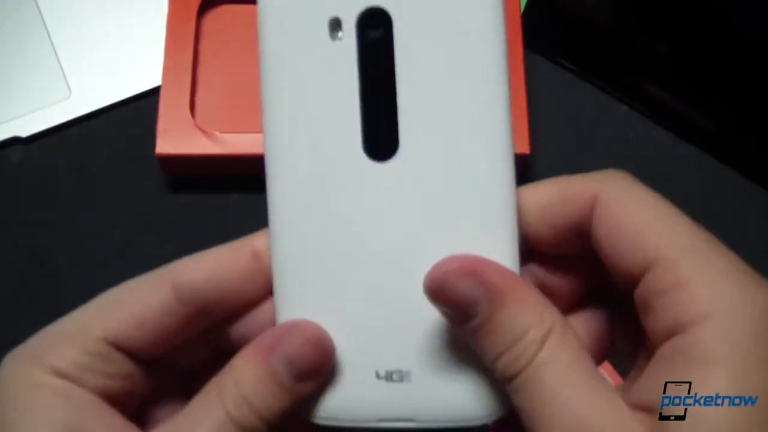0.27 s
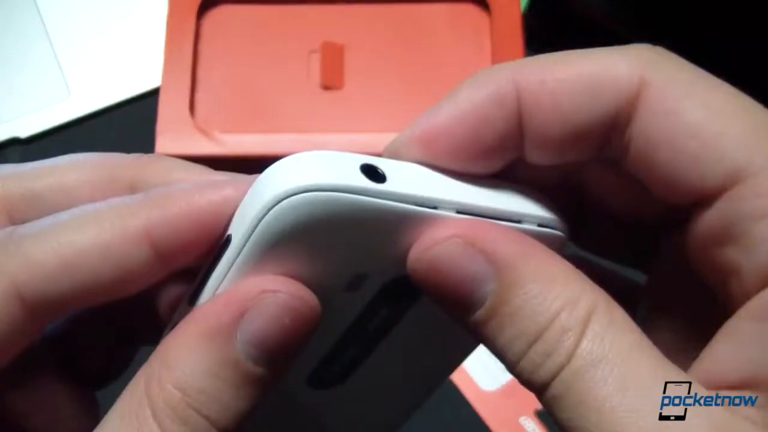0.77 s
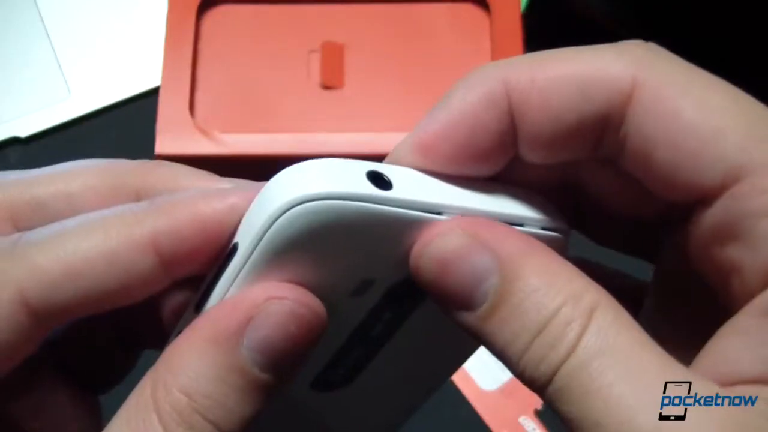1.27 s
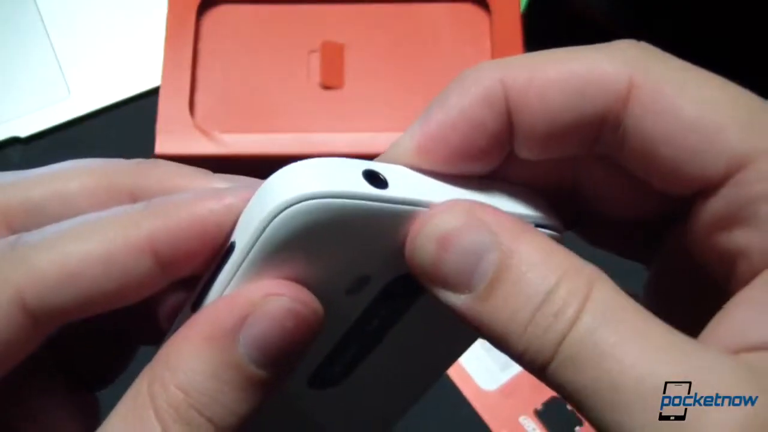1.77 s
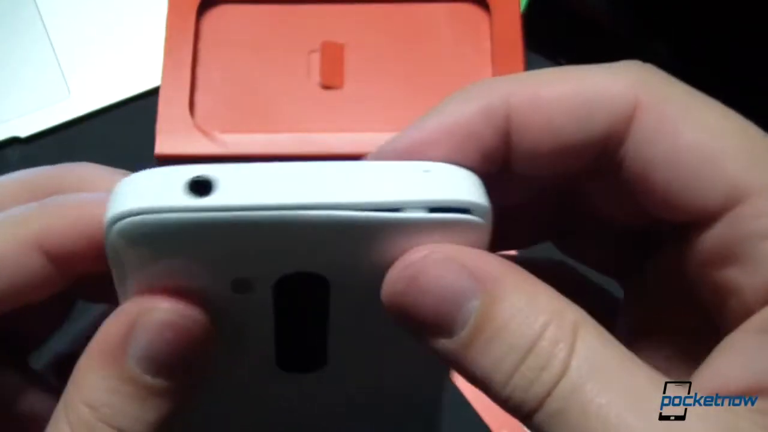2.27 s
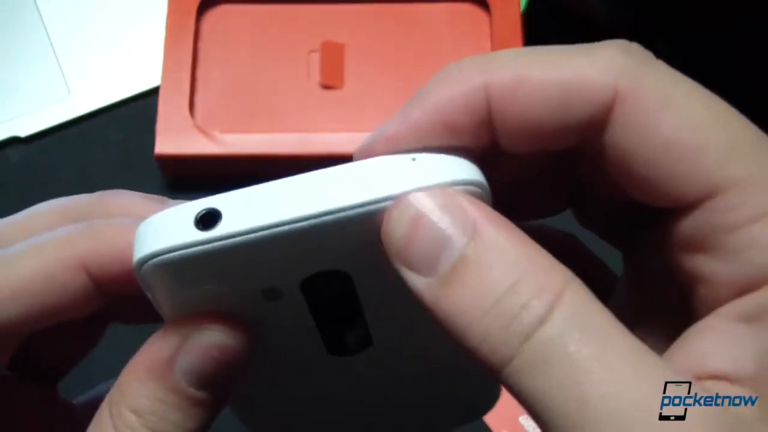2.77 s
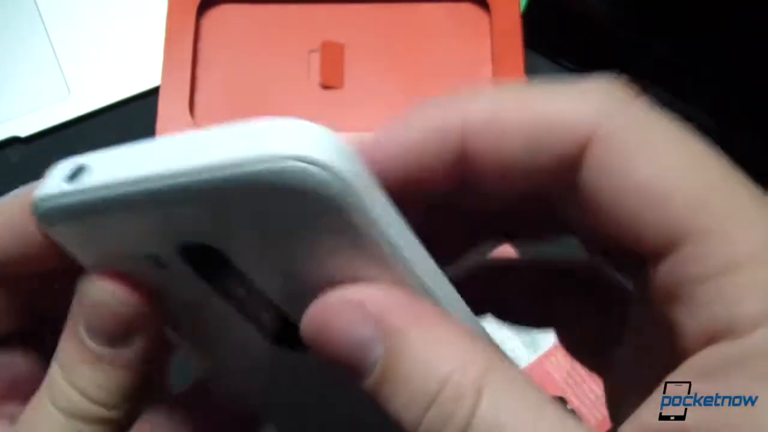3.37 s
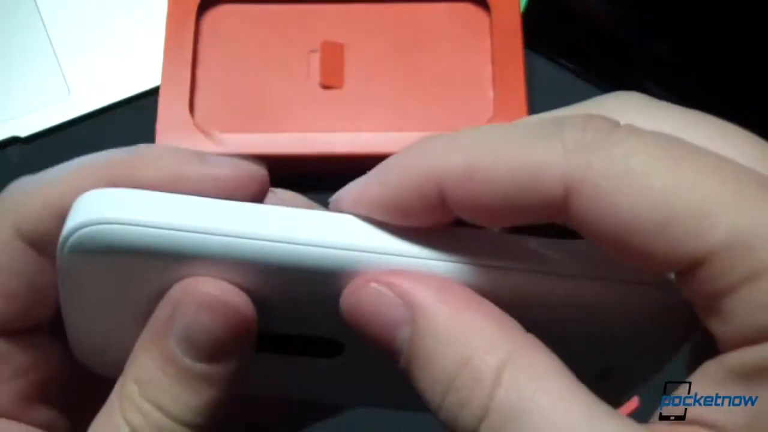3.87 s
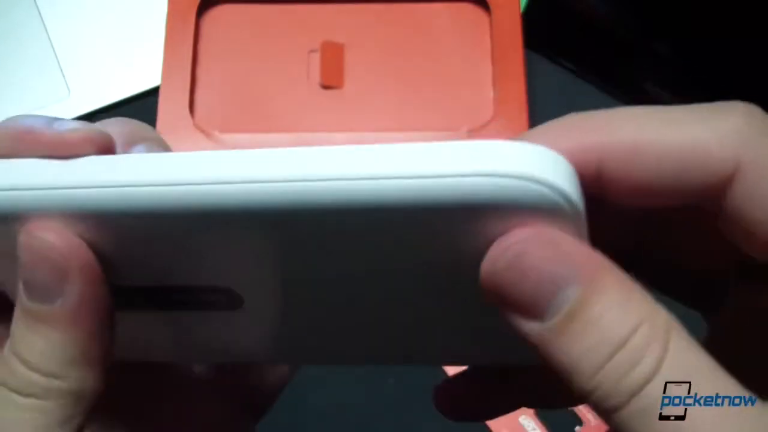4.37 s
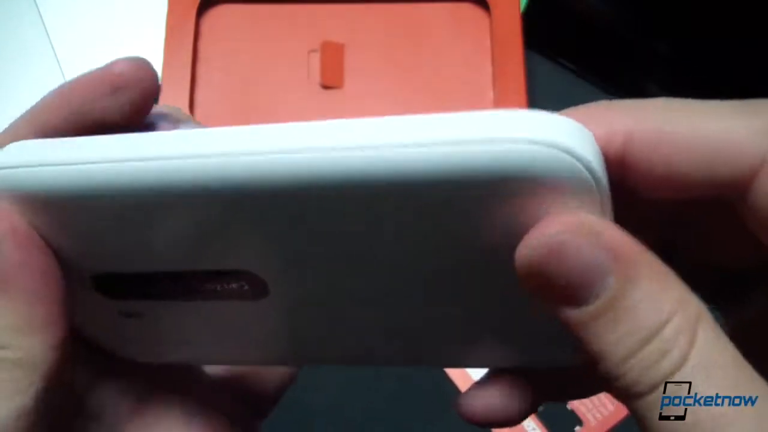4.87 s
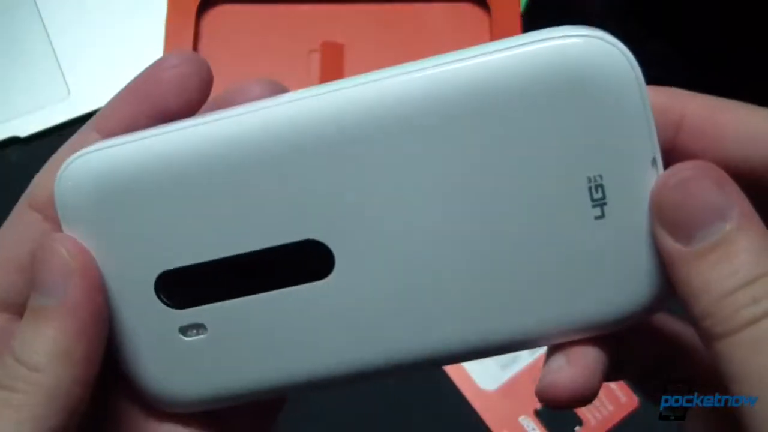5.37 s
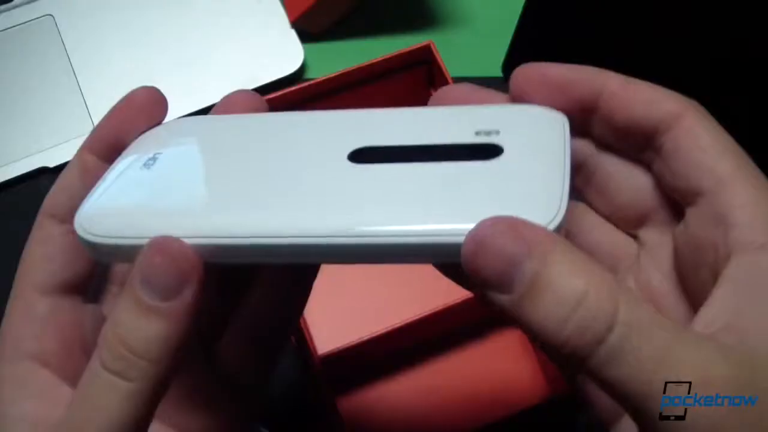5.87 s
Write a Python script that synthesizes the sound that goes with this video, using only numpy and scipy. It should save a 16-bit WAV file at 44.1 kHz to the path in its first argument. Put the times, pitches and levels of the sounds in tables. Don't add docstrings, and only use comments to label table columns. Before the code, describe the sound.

Three loud, short plastic clicks, the first immediate, the others near the middle, each a hard crack with a hollow shell ring dying in a few hundredths of a second. Around the later two come tiny nail ticks, soft knocks, creaks and skin rubs, which thin out afterwards. Close, dry indoor sound at a desk, with a dull surface answer, faint deep rumble and steady microphone hiss.

```python
import sys
import numpy as np
from scipy import signal
from scipy.fft import rfft, irfft, next_fast_len
from scipy.io import wavfile
from scipy.ndimage import map_coordinates

SR = 44100
rng = np.random.default_rng(int(sys.argv[2]) if len(sys.argv) > 2 else 0)


def materialize(psi):
    bounded = np.clip(np.atleast_2d(psi).T, -1, 1)
    quanta = np.round(bounded * 32767).astype(np.int16)
    wavfile.write(sys.argv[1], SR, quanta)


def gain_from_decibels(decibels):
    exponent = np.asarray(decibels, float) / 20
    return 10 ** exponent


N = 269671


def unit(x):
    return x / np.sqrt(np.mean(x ** 2) + 1e-20)


def along(points, hz):
    f, v = np.transpose(points)
    return np.interp(np.log(hz + 1), np.log(f + 1), v)


def filtered(x, response):
    m = next_fast_len(len(x) + 8192)
    return irfft(rfft(x, m) * response(np.fft.rfftfreq(m, 1 / SR)), m)[:len(x)]


def hump(centre_hz, octaves):
    return lambda hz: np.exp(-.5 * (np.log2((hz + 1) / centre_hz) / octaves) ** 2)


def wobble(rate):
    return map_coordinates(rng.standard_normal(128), [np.arange(N) * rate / SR])


def add(track, s, sound):
    part = track[round(s * SR):][:len(sound)]
    part += sound[:len(part)]


# frequency in Hz, density in dB per Hz.
HISS_SPECTRUM = [(88, -30), (150, -5), (236, -4.5), (356, -7), (409, -11), (594, -13.5), (1230, -16),
                 (1530, -20), (15000, -29), (16500, -31.5)]


def microphone_hiss():
    hiss = unit(filtered(rng.standard_normal(N), lambda hz: gain_from_decibels(along(HISS_SPECTRUM, hz))))
    air = unit(filtered(rng.standard_normal(N), hump(500, 1.0)))
    swell = map_coordinates(rng.standard_normal(60), [np.arange(N) / SR * 7])
    return gain_from_decibels(-70.5) * hiss + gain_from_decibels(-82.5 + 3 * np.tanh(swell)) * air


# frequency in Hz, density in dB per Hz.
RUMBLE_SPECTRUM = [(30, -21), (45, -1.5), (90, -2), (160, -11), (250, -34)]


def building_rumble():
    spectrum = [(15, -120)] + RUMBLE_SPECTRUM + [(600, -120)]
    rumble = unit(filtered(rng.standard_normal(N), lambda hz: gain_from_decibels(along(spectrum, hz))))
    return gain_from_decibels(-67 + 2.5 * wobble(11)) * rumble


# time in seconds, level in dB.
HUM_LEVEL = [(0.0, -52.5), (0.98, -54), (1.05, -61), (1.22, -52.5), (1.92, -54.5), (2.01, -63),
             (2.06, -53.5), (2.87, -56), (3.13, -64), (3.25, -50), (3.59, -46.5), (4.76, -57), (5.53, -53),
             (6.11, -55.5)]


def room_hum():
    t = np.arange(N) / SR
    scatter = unit(filtered(rng.standard_normal(N), hump(34, .3)))
    tone = np.sin(2 * np.pi * 23.7 * t + 0.73 * wobble(6))
    hum = unit(tone + 0.28 * scatter)
    return gain_from_decibels(np.interp(t, *np.transpose(HUM_LEVEL)) + 2.5 * wobble(6.3)) * hum


# middle in seconds, half length in seconds, frequency in Hz,
# level in dB, rise in Hz per second.
MACHINE_SWELLS = [
    (2.16, 0.082, 87.3, -59, 4),
    (5.825, 0.19, 92.6, -58, 18),
]


def distant_machine():
    t = np.arange(N) / SR
    drone = np.zeros(N)
    for mid, half, hz, db, rise in MACHINE_SWELLS:
        from_mid = t - mid
        envelope = gain_from_decibels(db) * np.exp(-(from_mid / half) ** 4)
        drone += envelope * np.sin(2 * np.pi * (hz + rise * from_mid / 2) * from_mid)
    return drone


# time in seconds, level in dB, frequency in Hz.
DESK_NUDGES = [(0.442, -58, 305.7), (0.711, -53.5, 172), (2.795, -45.5, 262), (3.062, -54.5, 77.4),
               (3.521, -48, 127), (3.565, -43, 80.6), (3.678, -55, 152), (4.872, -48, 70.3),
               (5.99, -54.5, 60)]


def desk_nudges():
    t = np.arange(N) / SR
    track = np.zeros(N)
    for s, db, hz in DESK_NUDGES:
        track += gain_from_decibels(db) * np.exp(-2 * ((t - s) * hz) ** 2) * np.sin(2 * np.pi * hz * (t - s))
    return track


def desk_top(x):
    t = np.arange(SR // 4) / SR
    tail = filtered(rng.standard_normal(len(t)), hump(360, .55))
    tail = tail * gain_from_decibels(-60 * t / .1) * (1 - np.exp(-t / .004))
    return gain_from_decibels(-31) * signal.fftconvolve(x, tail / np.linalg.norm(tail))[:N]


# time in seconds, level in dB, centre frequency in Hz.
NAIL_TICKS = [(.392, -55.5, 1500), (.533, -57, 1484), (.601, -61, 1800), (.715, -60, 1300),
              (2.049, -55, 5500), (2.2317, -56.5, 3350), (2.32, -62.5, 2500), (2.7950, -55, 4000),
              (2.8186, -53, 5500), (2.8252, -42, 2000), (3.2, -64, 2000), (3.462, -57, 5000),
              (3.548, -55, 2400), (3.881, -61, 1990), (3.947, -62, 6500), (4.064, -61.5, 2000),
              (4.326, -58, 2200), (4.338, -60, 2300), (4.399, -58.5, 2600), (4.862, -57.5, 5000),
              (5.895, -57, 2900)]
FLAT_TAPS = [(3.0572, -55.5, 5985), (3.069, -50, 3600), (3.5626, -53, 2300), (3.672, -61, 2200),
             (4.3582, -47, 5000), (4.80, -62, 3000)]
CREAKS = [(.0478, -37, 1700), (.494, -61.5, 5500), (1.7545, -50, 1993), (2.5117, -49.5, 2500),
          (3.0568, -55, 2500), (3.5826, -53.5, 3300), (4.1897, -55, 2500), (4.3818, -54.5, 3600)]
PAD_PATS = [(.4557, -53.5, 4500), (2.0067, -54.5, 2720), (2.0376, -56.5, 2500), (3.3751, -57, 1498)]
RATTLES = [(.0614, -19, 10000), (.0698, -31, 10000), (.392, -56, 6800)]


def small_contacts():
    track, t = np.zeros(N), np.arange(SR // 16) / SR
    # contacts, width in octaves, t60 in seconds
    kinds = [(NAIL_TICKS, .75, .013), (FLAT_TAPS, 1.65, .02), (CREAKS, .75, .03),
             (PAD_PATS, 1.4, .035), (RATTLES, .27, .0069)]
    for contacts, octaves, t60 in kinds:
        for s, db, centre_hz in contacts:
            burst = unit(filtered(rng.standard_normal(len(t)), hump(centre_hz, octaves)))
            add(track, s, gain_from_decibels(db - 60 * t / t60) * (1 - np.exp(-t / .0004)) * burst)
    return track


# time in seconds, level in dB, share of the deep mode in dB.
SOFT_KNOCKS = [(2.007, -54.5, -11), (2.04, -53, -10), (2.511, -57.5, 5), (2.7945, -47.5, -5),
               (2.818, -47, -7), (3.0568, -40, -30), (3.375, -50.5, -20), (3.5626, -55.5, -0.5),
               (4.19, -53, -20), (4.358, -58, -17)]


def soft_knocks():
    track, t = np.zeros(N), np.arange(SR // 16) / SR
    for s, db, deep_db in SOFT_KNOCKS:
        upper = gain_from_decibels(-60 * t / .022) * np.sin(2 * np.pi * 980 * t)
        deep = gain_from_decibels(deep_db - 60 * t / 0.06) * np.sin(2 * np.pi * 335 * t)
        add(track, s, gain_from_decibels(db) * (1 - np.exp(-t / 0.00074)) * (upper + deep))
    return track


# middle in seconds, half length in seconds, level in dB,
# centre frequency in Hz, width in octaves.
FINGER_SLIDES = [(0.322, .03, -69.5, 3040, 1.3), (0.462, 0.022, -64, 4000, 1.7),
                 (0.705, 0.019, -71.5, 4000, 1.9), (2.0, 0.013, -63, 5000, 3.5),
                 (2.045, 0.015, -78, 9000, 1.3), (3.026, 0.018, -64, 9150, 0.44),
                 (3.027, 0.03, -64.5, 2970, 2.7), (2.024, 0.018, -70, 6000, 1.7),
                 (3.357, 0.038, -67, 8000, 3.3), (3.375, 0.016, -66, 4000, 3.2),
                 (3.588, 0.011, -65.5, 1500, 2), (4.187, 0.029, -65.5, 3470, 1.54),
                 (4.99, .03, -71.5, 5980, 2.9), (6.05, 0.12, -74, 9000, 2)]


def finger_slides():
    track = np.zeros(N)
    from_mid = np.linspace(-1 / 8, 1 / 8, SR // 4)
    n = len(from_mid)
    for s, half, db, centre_hz, octaves in FINGER_SLIDES:
        noise = rng.standard_normal(n)
        grip = np.repeat(rng.standard_normal(n), 70)[:n]
        rub = unit(filtered(noise * gain_from_decibels(2.5 * grip), hump(centre_hz, octaves)))
        add(track, s - 1 / 8, gain_from_decibels(db) * np.exp(-2 * (from_mid / half) ** 2) * rub)
    return track


def fingers():
    touches = small_contacts() + soft_knocks() + finger_slides()
    return filtered(touches, lambda hz: 1 / np.sqrt(1 + (hz / 12500) ** 6))


# time in seconds, level in dB.
SETTLES = [
    (2.511, -46.5),
    (4.3572, -46),
]
# frequency in Hz, bandwidth in Hz, level in dB.
SETTLE_RINGS = [
    [(614, 270, -8.5), (1050, 240, -1.5), (1400, 410, -3.5), (1890, 133, 4), (2670, 560, -21),
     (4000, 340, -10), (5500, 1020, -17.5)],
    [(1580, 320, -4.5), (1940, 360, -5.5), (2500, 210, -1.5), (3200, 1100, -13.5), (3960, 300, -1),
     (5000, 1100, -15), (6600, 770, -13.5)],
]


def settling_catches():
    track, t = np.zeros(N), np.arange(SR // 16) / SR
    for (s, level_db), rings in zip(SETTLES, SETTLE_RINGS):
        def modes(f):
            return sum((-1) ** k * gain_from_decibels(db) * 1j * f * width / (hz * hz - f * f + 1j * f * width)
                       for k, (hz, width, db) in enumerate(rings))
        scrape = rng.standard_normal(len(t)) * gain_from_decibels(-60 * t / 0.025)
        sound = filtered(scrape, modes)
        add(track, s, gain_from_decibels(level_db) * sound / sound[:200].std())
    return track


def shell_ring(shell, rise):
    t = np.arange(SR // 4) / SR
    ring = sum((-1) ** k * gain_from_decibels(db - 60 * t / t60) * np.sin(2 * np.pi * hz * t)
               for k, (hz, db, t60) in enumerate(shell))
    choke = np.exp(-(t / .027) ** 2)
    return ring * choke * (1 - np.exp(-t / rise))


# frequency in Hz, t60 in seconds.
CRACK_DECAY = [(1000, 0.067), (4000, .043), (8000, 0.033), (14000, .026)]


def crack_noise(colour):
    t = np.arange(SR // 4) / SR
    hz, frame, z = signal.stft(rng.standard_normal(len(t)), SR, nperseg=128)
    gain = gain_from_decibels(along(colour, hz)[:, None] - 60 * frame / along(CRACK_DECAY, hz)[:, None])
    crack = signal.istft(z * gain, SR, nperseg=128)[1][:len(t)]
    crack = crack * (1 - np.exp(-t / .0002)) * (1 + 5.9 * np.exp(-t / 0.0044))
    return crack / crack[:200].std()


# frequency in Hz, level in dB, t60 in seconds.
SPRINGS = [
    (6495, -3, .25),
    (6550, -5, .22),
    (2790, -7, .3),
]


def snap(blow_db, crack_db, push_db, rise, spring_db, shell, colour):
    t = np.arange(SR // 4) / SR
    spring = sum(gain_from_decibels(db - 60 * t / t60) * np.sin(2 * np.pi * hz * t) for hz, db, t60 in SPRINGS)
    push = np.sin(2 * np.pi * 150 * t) * gain_from_decibels(-60 * t / 0.02)
    sound = gain_from_decibels(blow_db) * shell_ring(shell, rise) + gain_from_decibels(crack_db) * crack_noise(colour)
    return sound + gain_from_decibels(spring_db) * spring + gain_from_decibels(push_db) * push


# time in seconds, blow in dB, crack in dB,
# air push in dB, rise in seconds.
SNAPS = [
    (0.054, -1, -9.5, -26, 0.0005),
    (1.7593, -4, -11, -19.5, .0012),
    (2.8272, -1, -10, -17.5, 0.0008),
]
SPRING_DB = [-72, -64, -63]
# frequency in Hz, level in dB, t60 in seconds.
FIRST_SHELL = [(272, -17.5, 0.029), (334, -14.5, 0.046), (505, -21.5, .04), (712, -18, .04),
               (960, -19.5, .035), (1180, -11, 0.042), (1300, -10, .04), (1455, -8.5, 0.037),
               (1560, -29.5, .03), (1700, -1.5, 0.026), (2022, -8.5, 0.018), (2210, -11.5, .03),
               (2530, -14, 0.0058), (2970, -11.5, 0.026), (3300, -11.5, 0.025), (3740, -14.5, .025),
               (4200, -9, .022)]
SECOND_SHELL = [(337.1, -18, 0.052), (488.3, -18.5, 0.039), (756, -15.5, 0.031), (942.5, -2, 0.0342),
                (1024.3, -3.5, .03), (1180, -13, .035), (1473, -1.5, 0.025), (2062, -3.5, .022),
                (2420, -9, 0.029), (3140, -17, 0.0095), (3805, -12, 0.021)]
THIRD_SHELL = [(238.7, -26.5, .04), (348, -20, 0.063), (454.2, -23, .045), (533, -25, .04),
               (768, -15.5, 0.045), (962, 1.5, 0.022), (1063.6, -3, .03), (1295.7, -10.5, .035),
               (1513, -12.5, .035), (1950, -12.5, 0.036), (2320, -14, 0.026), (2890, -18, .03),
               (3670, -5.5, 0.017), (4500, -9.5, 0.023)]
# frequency in Hz, density in dB per Hz.
FIRST_CRACK = [(600, -36.5), (1300, -13.5), (2500, -11.5), (4200, -9), (7000, -8.5), (11500, -10.5),
               (14500, -18.5), (16300, -29.5)]
SECOND_CRACK = [(600, -36), (1300, -7), (2500, -14.5), (4500, -13), (7500, -14.5), (10000, -12.5),
                (14000, -23), (16300, -31)]
THIRD_CRACK = [(600, -32.5), (1300, -8), (2600, -16.5), (4200, -12), (7000, -20), (11000, -17),
               (14500, -20.5), (16300, -33.5)]


def snapping_catches():
    track = np.zeros(N)
    shells = (FIRST_SHELL, SECOND_SHELL, THIRD_SHELL)
    colours = (FIRST_CRACK, SECOND_CRACK, THIRD_CRACK)
    for (s, *levels), spring_db, shell, colour in zip(SNAPS, SPRING_DB, shells, colours):
        add(track, s, snap(*levels, spring_db, shell, colour))
    return track


def scene():
    phone = snapping_catches() + settling_catches() + fingers()
    room = room_hum() + building_rumble() + distant_machine() + desk_nudges()
    return (phone + desk_top(phone) + room)[None]


def top_cut(x):
    return signal.sosfilt(signal.butter(12, 16760, fs=SR, output="sos"), x)


def record(dry):
    hiss = microphone_hiss()
    x = dry[0] + hiss
    x = x / (1 + np.abs(x / .98) ** 6) ** (1 / 6)
    mix = filtered(x, lambda hz: np.clip(.5 + (16030 - hz) / 400, .12, 1))[None]
    return top_cut(mix)


dry = scene()
out = record(dry)
materialize(out)
```